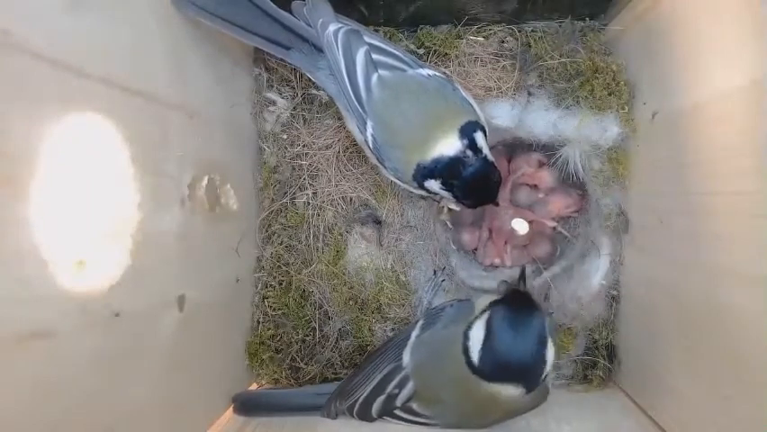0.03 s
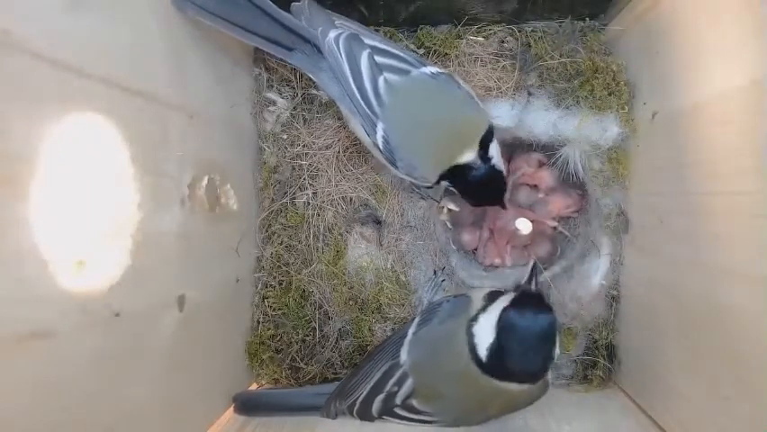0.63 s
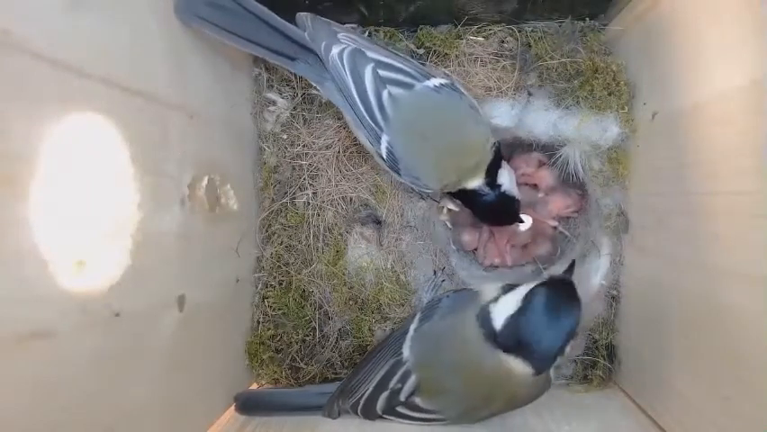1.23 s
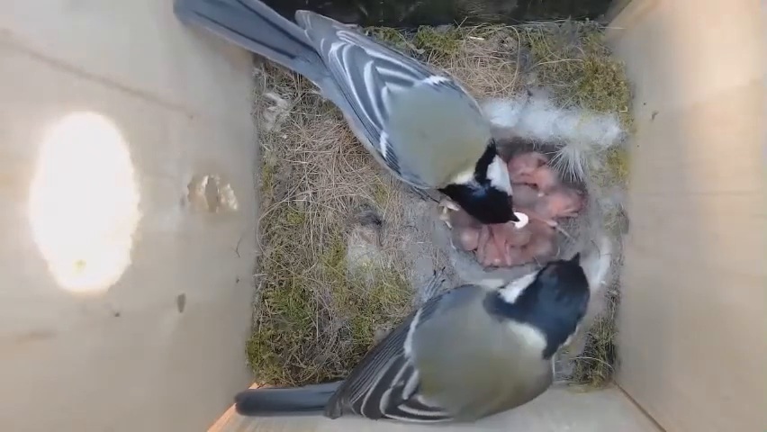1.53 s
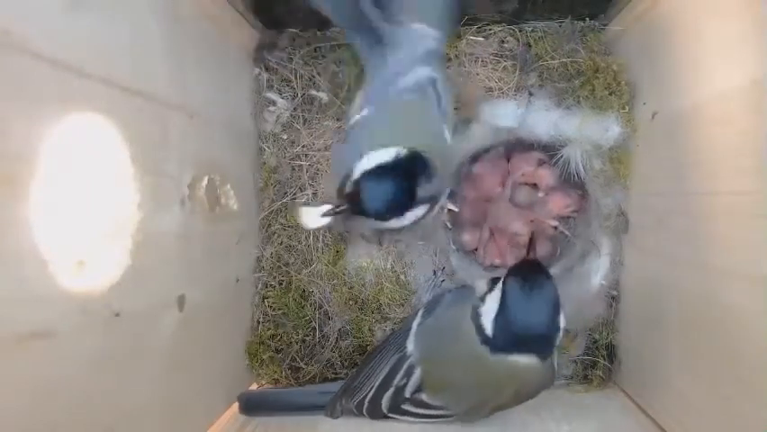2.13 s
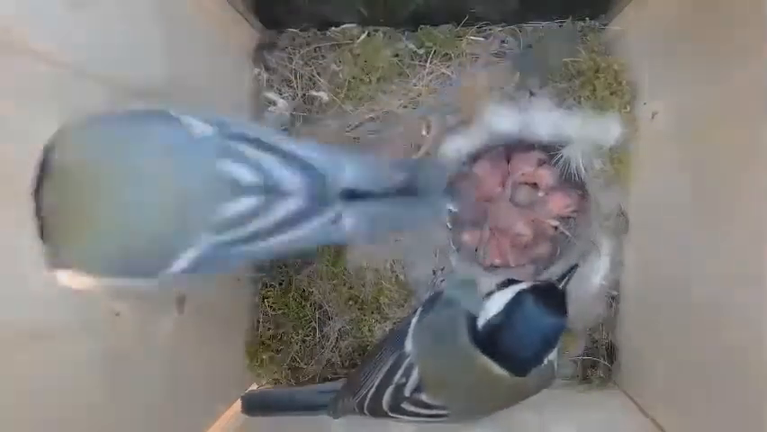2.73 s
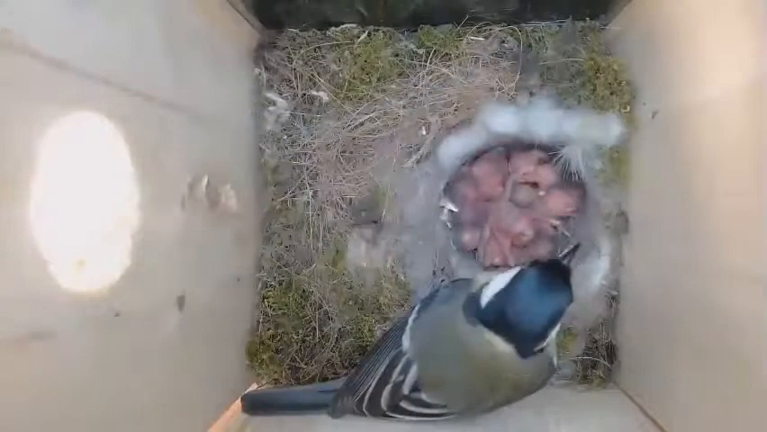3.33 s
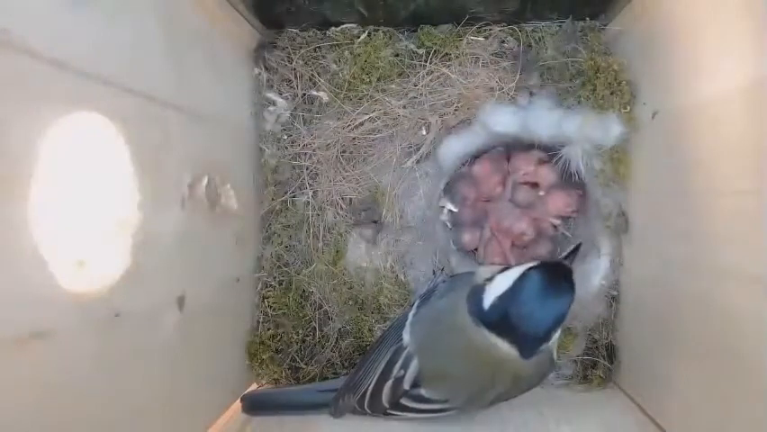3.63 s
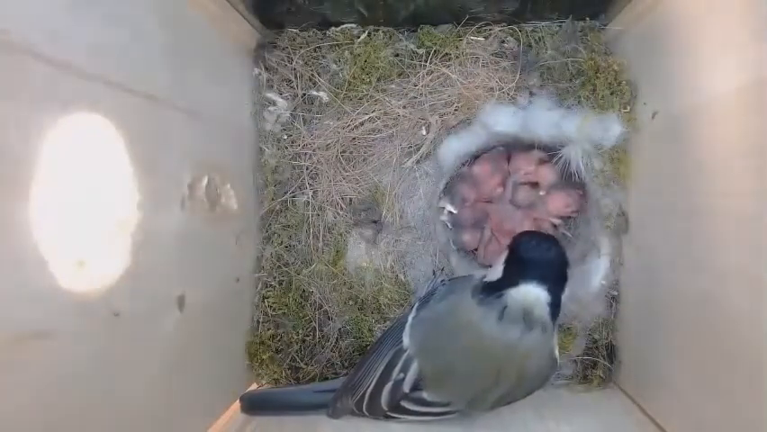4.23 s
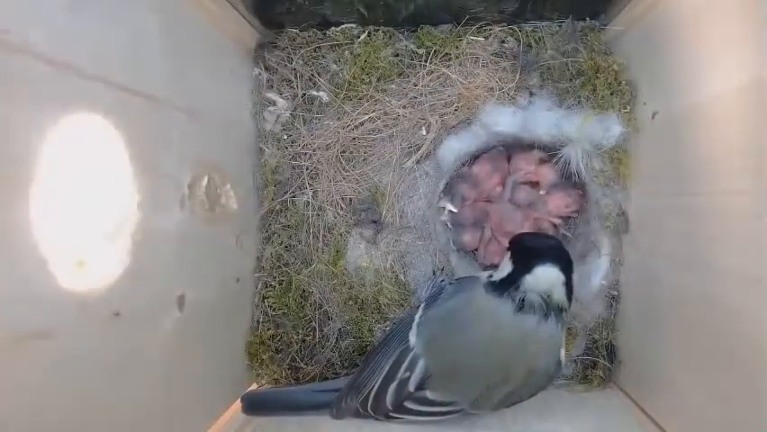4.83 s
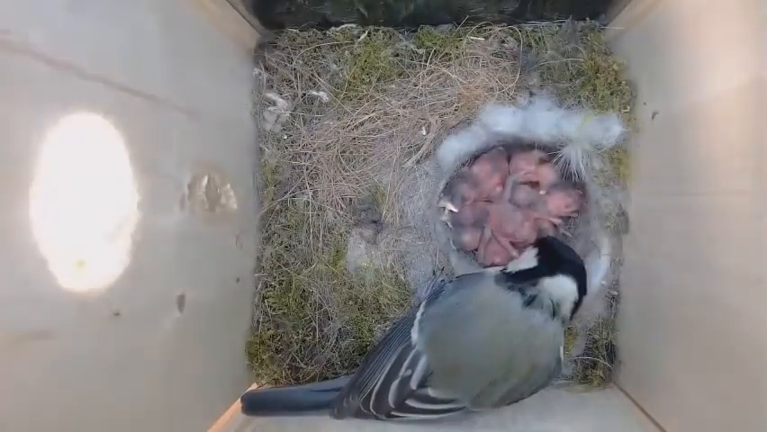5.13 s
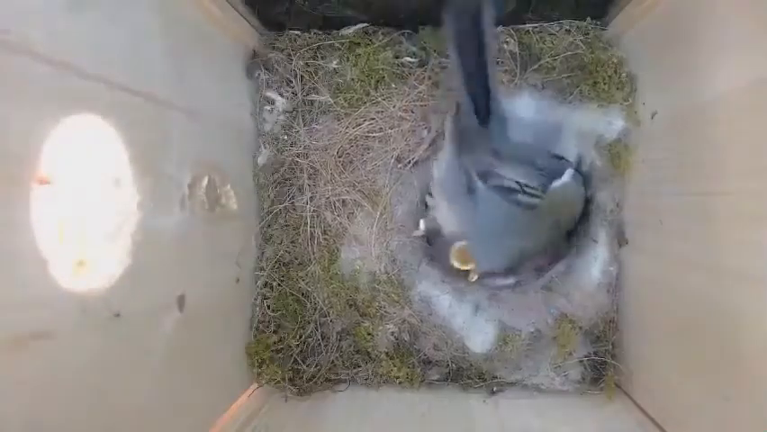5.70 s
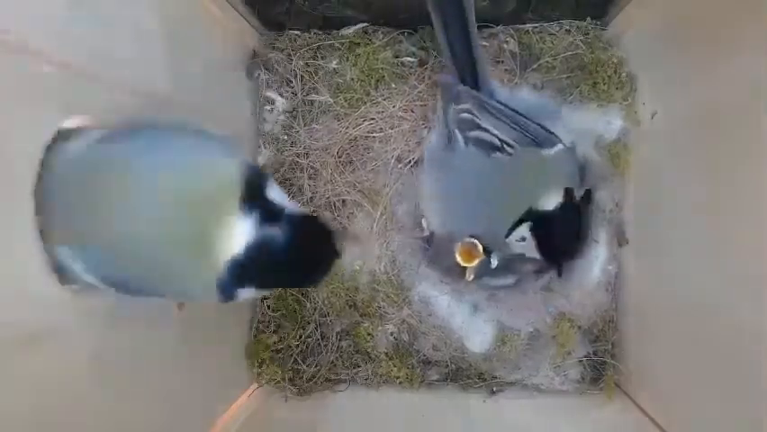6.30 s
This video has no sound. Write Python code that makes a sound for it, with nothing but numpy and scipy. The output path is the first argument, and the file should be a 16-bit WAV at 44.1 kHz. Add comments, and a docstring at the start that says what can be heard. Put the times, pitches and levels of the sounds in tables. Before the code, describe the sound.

Nestlings cheep thinly inside a wooden nest box while an adult bird churrs, scuffs and knocks against the walls.

```python
"""Inside a wooden nest box that colours every sound, over outdoor air and a small camera's faint whine.
Nestlings whistle thin, arched cheeps, shifting feet thump the floor and an adult tit churrs in short
pulse trains. The churrs grow, then claws and wings scuff the walls as one parent climbs out.
A dull knock stutters on the wall and the sound cuts out briefly. It comes back with brighter air
and louder cheeps, and the parent lands again."""
import sys
import numpy as np
from scipy import signal
from scipy.fft import rfft, irfft, next_fast_len
from scipy.io import wavfile
from scipy.ndimage import uniform_filter1d

SR = 44100
rng = np.random.default_rng(int(sys.argv[2]) if len(sys.argv) > 2 else 0)


def wav_out(sig):
    """Save sig, one row per channel (or a flat mono array), as 16-bit PCM at SR to the path in sys.argv[1]."""
    wavfile.write(sys.argv[1], SR, np.round(np.clip(np.atleast_2d(sig).T, -1, 1) * 32767).astype(np.int16))


N = 284886
DROPOUT_START_S, DROPOUT_END_S = 5.375, 5.411

# air and panel resonances of the box: (frequency [Hz], width [Hz], level [dB])
BOX_MODES = [(377.5, 45, -11), (411.9, 36, 3), (480, 42, -11), (560, 39, -11.5), (615.7, 27, -2.5),
             (647.5, 14, -19), (840, 56, -18), (984.3, 40, -8), (1040, 78, -18), (1157, 16, -6),
             (1259.5, 47.5, -1.5), (1315, 30, -18), (1602, 42, -17.5), (1821, 52, -7), (2023, 85, 1.5),
             (2251, 47, -2.5), (2460, 65, -26.5), (3760, 600, -21.5), (5036, 99, -18.5)]
# how well the wood carries sound: (frequency [Hz], gain [dB])
WOOD_EQ = [(200, 10), (310, -13.5), (380, 0), (700, 0), (1300, 1), (2350, -4.5), (2800, -11), (3300, -5.5),
           (3950, -1), (5600, -5), (6800, -2.5), (9000, -11.5)]
# outdoor air before the box colours it: (frequency [Hz], level [dB])
AIR_EQ = [(300, -4), (400, -12), (630, 2), (1000, 4.5), (1300, 0.5), (1600, 5), (1800, 1), (2050, -15),
          (2400, -7.5), (2950, -4), (3800, -12), (4400, -20), (8000, -17)]
# the air slowly dying down: (time [s], level [dB])
AIR_FADE = [(0, -66.5), (.8, -67), (1.5, -70.5), (2.9, -70.5), (3.6, -72), (5.37, -77.5)]
# the restless low bed: (frequency [Hz], level [dB])
RUMBLE_EQ = [(15, -49), (30, -43), (55, -18.5), (90, -5), (124, -5.5), (160, -3.5), (200, -24.5),
             (300, -32.5), (600, -80), (2000, -120)]
# feathers shuffling in the moss: (peak time [s], half length [s], level [dB])
SHUFFLES = [(0.155, 0.19, -62.5), (1.072, 0.0094, -62.5), (1.277, 0.075, -64.5), (1.873, 0.031, -66.5),
            (3.142, 0.16, -68.5), (3.736, 0.038, -65), (4.231, 0.014, -63), (4.523, .06, -56.5),
            (5.898, 0.11, -62.5), (6.44, .05, -49)]
# heavier steps on the nest floor: (peak time [s], level [dB], pitch [Hz])
FOOTFALLS = [(0.616, -40.5, 123), (0.658, -50, 126), (1.353, -48.5, 104), (1.573, -47.5, 154),
             (1.902, -45.5, 145), (2.486, -47.5, 128), (2.75, -45.5, 134.4), (3.253, -41, 139),
             (3.294, -36.5, 132), (3.481, -33.5, 124), (3.673, -43, 117), (3.703, -35.5, 137),
             (3.743, -37.5, 149), (4.311, -43.5, 122), (4.342, -45, 116), (4.942, -50.5, 130),
             (5.922, -45, 134), (6.205, -36, 119.5), (6.299, -36, 147), (6.389, -46.5, 142)]
# stuttering blows on the wall: (time [s], level [dB])
WALL_BLOWS = [(5.09, -29), (5.104, -24), (5.121, -34.5), (5.135, -44.5)]
# that wall's ring: (frequency [Hz], level [dB], t60 [s])
WALL_MODES = [(445, -20.5, 0.21), (617, -6.5, 0.16), (687, -13.5, 0.18), (885, -3.5, 0.17),
              (1210, -6, 0.11), (1314, 4.5, 0.12), (1353, -12.5, 0.17), (1484, -21.5, .08),
              (1848, -18.5, 0.1)]
# dry claw snaps: (time [s], level [dB])
CLAW_TICKS = [(2.562, -40), (2.614, -46), (2.709, -47), (2.866, -49.5), (3.048, -55.5), (6.289, -34.5)]
# claw and wing strokes: (peak time [s], level [dB], swell [s], t60 [s], hardness [dB], scratch [dB])
STROKES = [(.125, -65, .015, 0.077, 7.5, -42), (0.22, -67.5, 0.01, 0.07, 6, -35),
           (1.078, -61.5, 0.0034, .06, 5.5, -2.5), (1.402, -51.5, 0.013, 0.18, -24, -45),
           (1.503, -53, 0.0089, 0.089, -26, -45), (2.584, -56.5, 0.0067, 0.042, -13, -12),
           (2.928, -48, 0.0044, 0.049, -8.5, -10.5), (2.966, -42.5, 0.023, 0.1, -1.5, -16),
           (3.055, -52, 0.033, 0.31, -20, -15.5), (3.231, -44, 0.005, 0.23, -2.5, -21.5),
           (3.249, -43.5, 0.0021, 0.071, 3.5, -5.5), (3.265, -35.5, 0.009, 0.093, 5, -18),
           (3.305, -36.5, 0.022, 0.092, -14.5, -29), (3.451, -46.5, 0.0076, 0.065, 3, -26),
           (3.467, -38.5, 0.0069, 0.12, 2, -19.5), (3.533, -43.5, 0.019, 0.16, -1.5, -13.5),
           (3.561, -40.5, 0.0084, 0.071, 1.5, -11.5), (4.404, -49, .005, .14, -16.5, -45),
           (4.503, -41.5, 0.0012, 0.14, -8.5, -45), (5.912, -62, 0.017, 0.26, -14, -17.5),
           (6.291, -29.5, 0.0018, 0.078, 5, -11.5), (6.311, -35.5, 0.0048, 0.18, -5, -27.5),
           (6.384, -36, 0.0015, 0.1, -2, -24)]
# a stroke's hollow, knock, edge and scratch bands: (low [Hz], high [Hz])
STROKE_BANDS = [(300, 780), (780, 1550), (1550, 2700), (2700, 7500)]
# nestling calls: (time [s], length [s], top of the arch [Hz], level [dB])
NESTLING_CHEEPS = [(0.053, 0.036, 7600, -69.5), (.332, 0.041, 7300, -67), (0.773, 0.046, 7160, -66),
                   (1.072, 0.044, 7330, -64), (1.526, 0.035, 6790, -66), (2.227, 0.043, 7340, -66.5),
                   (3.898, 0.04, 7520, -66), (4.371, 0.039, 7170, -66.5), (4.905, 0.022, 6250, -79),
                   (5.474, 0.072, 8160, -60.5), (5.616, 0.072, 8120, -64.5), (5.696, 0.025, 6140, -61),
                   (5.793, .075, 8300, -57.5), (5.9, .052, 7520, -72), (5.945, 0.074, 8000, -64),
                   (5.952, 0.029, 6560, -57), (6.012, 0.059, 7350, -54.5), (6.231, 0.024, 6140, -70),
                   (6.353, 0.069, 8250, -57.5), (6.4, 0.037, 6630, -59.5)]
# the adult's pulse trains: (first pulse [s], last pulse [s], first pitch [Hz], last pitch [Hz],
# level [dB], opening offset [dB], closing offset [dB], second harmonic offset [dB])
ADULT_CHURRS = [(0.812, .891, 2276, 2330, -46.5, -12.5, -12, -2.5),
                (0.971, 1.056, 2375, 2174, -61.5, -0.5, -19, 5),
                (2.444, 2.47, 2320, 2280, -59, 9.5, 6.5, -1),
                (2.536, 2.616, 2394, 2418, -43.5, -5, 5, -13.5),
                (2.686, 2.82, 2455, 2323, -39.5, -13.5, -17, -11.5),
                (2.871, 2.981, 2367, 2438, -44, 4.5, -1, -24.5),
                (3.051, 3.189, 2474, 2460, -44.5, 1, -23.5, -24)]

# tone curves, each named for what it shapes: (frequency [Hz], gain [dB])
LATE_AIR_EQ = [(400, -1.5), (630, -6), (1100, -0.5), (1800, 2), (2600, 6), (3100, 9), (3800, -3),
               (5000, 2.5)]
DEEP_RUMBLE_EQ = [(12, -16), (25, -12), (50, 2.5), (80, 2), (160, -12), (300, -41), (2000, -100)]
RUSTLE_EQ = [(250, -42.5), (340, 1.5), (430, -4.5), (560, 4), (700, 10.5), (1000, -0.5), (1300, -8),
             (2400, -13), (2800, -17.5), (5000, -22.5), (9000, -32)]
RATTLE_EQ = [(300, -42), (600, -4), (900, -4.5), (1080, -7), (1300, -3.5), (1600, -14.5), (2300, -32),
             (3200, -48), (6000, -66)]
TICK_EQ = [(1500, -34), (4000, -4.5), (7500, 5), (9500, 17.5), (12000, 14), (15000, 8.5)]
RASP_EQ = [(1800, -42.5), (2350, 0.5), (2850, -8), (3500, -1.5), (4300, -2), (5200, 3), (6000, -24.5),
           (7400, 3.5), (9000, -9)]
SIDE_EQ = [(100, -20.5), (600, -21), (1200, -21), (2200, -23.5), (6000, -20.5)]
CAMERA_EQ = [(7300, 0), (7700, -4), (8100, -23.5), (8800, -33), (12000, -46)]
FIZZ_EQ = [(8000, -105), (13000, -101), (15400, -84.5)]


def amp(db):
    """Decibels to gain."""
    return 10 ** (np.asarray(db) / 20)


def unit(x):
    """Scale to rms 1."""
    return x / np.sqrt(np.mean(x ** 2) + 1e-20)


def wobble(shape, samples):
    """Random drift at rms 1, smoothed over this many samples."""
    return unit(uniform_filter1d(rng.standard_normal(shape), size=samples))


def curve(points, hz):
    """Gain of a tone curve, read on a log frequency axis."""
    corners, db = np.transpose(points)
    return amp(np.interp(np.log(hz + 1), np.log(corners), db))


def filtered(x, response):
    """Filter x by a complex response of frequency."""
    n = x.shape[-1]
    padded = next_fast_len(n + 8192)
    return irfft(rfft(x, padded) * response(np.fft.rfftfreq(padded, 1 / SR)), padded)[..., :n]


def eq(x, points):
    """Shape x with a tone curve."""
    return filtered(x, lambda hz: curve(points, hz))


def add(track, start, sound):
    """Mix a sound into a track at start seconds."""
    i = max(round(start * SR), 0)
    track[i:i + len(sound)] += sound[:max(N - i, 0)]


def box(hz, direct_db=-23):
    """The colour of the box: its resonances over a weak direct path."""
    modes = sum(amp(db) * 1j * hz * width / (centre ** 2 - hz ** 2 + 1j * hz * width)
                for centre, width, db in BOX_MODES)
    return curve(WOOD_EQ, hz) * (amp(direct_db) + modes)


def walls(x, wet_db, t60, predelay_s=0.0012):
    """Add the dense, quickly dying reflections between the close walls."""
    t = np.arange(SR // 5) / SR
    tail = rng.standard_normal(len(t)) * amp(-60 * t / t60) * (t > predelay_s)
    return np.pad(x, (0, len(t) - 1)) + amp(wet_db) * signal.fftconvolve(x, tail / np.linalg.norm(tail))


def outdoor_air(late_air_db=-67, rumble_db=-68, late_rumble_db=-71, restless_db=3):
    """Outdoor air resonates in the box over a restless rumble, and is brighter after the dropout."""
    t = np.arange(N) / SR
    air = unit(filtered(rng.standard_normal(N),
                        lambda hz: box(hz) * curve(AIR_EQ, hz) * amp(-60 * (hz < 200))))
    swells = amp(restless_db * wobble(N, 4000))
    rumble = unit(swells * eq(rng.standard_normal(N), RUMBLE_EQ))
    early = amp(np.interp(t, *np.transpose(AIR_FADE))) * air + amp(rumble_db) * rumble
    late = amp(late_air_db) * eq(air, LATE_AIR_EQ) + amp(late_rumble_db) * rumble
    return np.where(t < DROPOUT_START_S, early, late)


def deep_rumble(level_db=-68):
    """A deeper rumble sets in once the sound comes back."""
    noise = unit(eq(rng.standard_normal(N), DEEP_RUMBLE_EQ))
    return amp(level_db) * noise * (np.arange(N) / SR > DROPOUT_END_S)


def camera_whine(frame_hz=30, pitch_hz=3360, early_db=-81, late_db=-69, shake_hz=35):
    """The electronics give a tiny, rough, hooked chirp once a frame, louder after the dropout."""
    t = np.arange(N) / SR
    early = t < DROPOUT_START_S
    cycle = (t * frame_hz + np.where(early, .11, -.1)) % 1 - .5
    pitch_shake, level_shake = wobble((2, N), 100)
    hook_hz = 500 * cycle ** 2 + 16000 * np.maximum(cycle - .12, 0) ** 2
    hz = pitch_hz + hook_hz + shake_hz * pitch_shake
    level = amp(np.where(early, early_db, late_db) + 2 * level_shake)
    return level * np.exp(-(cycle / .22) ** 2) * np.sin(2 * np.pi * np.cumsum(hz) / SR)


def feather_rustle(lumpy_db=5.5):
    """Swells of soft, uneven rubbing mostly wake the low resonances of the box."""
    t = np.arange(N) / SR
    pressure = sum(amp(db) * np.exp(-((t - peak) / half) ** 2) for peak, half, db in SHUFFLES)
    rubbing = amp(lumpy_db * wobble(N, 700)) * rng.standard_normal(N)
    return pressure * unit(filtered(rubbing, lambda hz: box(hz) * curve(RUSTLE_EQ, hz)))


def foot_thumps(rise_s=0.0057, fall_s=0.01085, shift_gap_s=0.17, shift_db=-56.5, shift_hz=130.7):
    """Each step sways the nest floor for a few low cycles; light shifts of weight fall in between."""
    out = np.zeros(N)
    lead = .05
    t = np.arange(SR // 5) / SR - lead
    swell = np.where(t < 0, np.exp(-(t / rise_s) ** 2), 1 / np.cosh(t / fall_s))
    shifts = [((k + .5 * late) * shift_gap_s, shift_db + 2 * weight, shift_hz + 23 * stiffness)
              for k, (late, weight, stiffness) in enumerate(rng.standard_normal((60, 3)), 1)]
    for peak, db, hz in FOOTFALLS + shifts:
        add(out, peak - lead, amp(db) * swell * np.sin(2 * np.pi * (hz * t + rng.random())))
    return out


def wall_knocks(attack_s=0.0032, swing_t60=0.022, ring_db=-12, rattle_db=-12, rattle_t60=0.17):
    """Soft blows ring one wall; the first swing dies fast and a weaker, rough ring stays."""
    out = np.zeros(N)
    t = np.arange(SR // 4) / SR
    onset = 1 - np.exp(-(t / attack_s) ** 2)
    for start, db in WALL_BLOWS:
        ring = sum(amp(level + 2 * rng.standard_normal() - 60 * t / t60)
                   * np.sin(2 * np.pi * (hz * t + rng.random())) for hz, level, t60 in WALL_MODES)
        ring *= amp(ring_db) + amp(-60 * t / swing_t60)
        rattle = unit(eq(rng.standard_normal(len(t)), RATTLE_EQ)) * amp(rattle_db - 60 * t / rattle_t60)
        add(out, start, amp(db) * onset * (ring + rattle))
    return out


def claw_ticks(t60=0.017):
    """A claw tip snaps on the wood: a very short, bright crack."""
    out = np.zeros(N)
    t = np.arange(SR // 30) / SR
    for start, db in CLAW_TICKS:
        add(out, start, amp(db - 60 * t / t60) * rng.standard_normal(len(t)))
    return eq(out, TICK_EQ)


def scuffs(grit=0.21, full_contact_db=-42.5, lead_in_db=-20, tail_db=-27, tail_t60=0.057):
    """Claws and wings ring the box with swelling scrapes; harder ones reach the higher bands."""
    out = np.zeros(N)
    lead = .08
    t = np.arange(SR // 3) / SR - lead
    hz = np.fft.rfftfreq(2 * len(t), 1 / SR)
    filters = [signal.butter(3, band, "bandpass", fs=SR, output="sos") for band in STROKE_BANDS]
    colour = np.array([signal.sosfreqz(sos, hz, fs=SR)[1] for sos in filters]) * box(hz)
    for peak, db, swell, t60, hardness, scratch in STROKES:
        rising = np.exp(-(t / swell) ** 2) + amp(lead_in_db) * np.exp(-(t / (2 * swell)) ** 2)
        falling = amp(-60 * t / t60) + amp(tail_db - 60 * t / tail_t60)
        stroke = np.where(t < 0, rising, falling)
        force = stroke * rng.standard_normal(len(t)) * np.exp(grit * wobble(len(t), 30))
        rings = irfft(rfft(force, 2 * len(t)) * colour)[:, :len(t)]
        softening = .9 * min(db - full_contact_db, 0)  # light strokes lose their edge
        gains = amp(db + np.array([0, hardness, hardness + softening - 2.5, scratch - 1]))
        makeup = np.linalg.norm(stroke) / np.linalg.norm(rings, axis=1)
        add(out, peak - lead, (gains * makeup) @ rings)
    return out


def cheeps(start_hz=5900, end_hz=5300, pull=0.8, fade_s=0.009, waver=.011, flutter_db=4.5, trim_db=-3):
    """Each nestling cheep is a thin, slightly hoarse whistle that climbs and drops along an arch."""
    out = np.zeros(N)
    for start, length, top, db in NESTLING_CHEEPS:
        t = np.arange(int(length * SR)) / SR
        noise = rng.standard_normal((2, len(t)))
        pitch_shake, level_shake = unit(signal.fftconvolve(noise, np.hanning(70)[None], "same"))
        # both ends are pulled towards the chick's resting pitch
        climb, drop = pull * np.abs([top - start_hz, top - end_hz])
        hz = top - np.linspace(-np.sqrt(climb), np.sqrt(drop), len(t)) ** 2
        swell = np.sin(np.pi / 2 * np.clip(np.minimum(t, length - t) / fade_s, 0, 1)) ** 2
        whistle = np.sin(2 * np.pi * np.cumsum(hz * (1 + waver * pitch_shake)) / SR)
        level = amp(db + trim_db + flutter_db * level_shake)
        add(out, start, walls(level * swell * whistle, wet_db=-5, t60=0.066))
    return out


def squeak(start_s=3.031, length_s=0.015, start_hz=2950, end_hz=3450, level_db=-53):
    """One short rising note opens the last churr."""
    out = np.zeros(N)
    hz = np.linspace(start_hz, end_hz, int(length_s * SR))
    note = np.hanning(len(hz)) * np.sin(2 * np.pi * np.cumsum(hz) / SR)
    add(out, start_s, walls(amp(level_db) * note, wet_db=-7, t60=.07))
    return out


def churr_pulses(period_s=.027, second_growth_db=9):
    """A churr starts thin and fills out downwards: yields (time [s], pitch [Hz], three harmonics [dB])."""
    for start, end, start_hz, end_hz, db, opening_db, closing_db, second_db in ADULT_CHURRS:
        for progress in np.linspace(0, 1, round((end - start) / period_s) + 1):
            effort = db + opening_db * (1 - progress) ** 5
            closing = closing_db * progress ** 5
            low = effort + 0.52 * closing  # the lower harmonics follow the closing only partly
            first = low - 10.5 - 26 * (1 - progress) ** 4
            second = low + second_db + second_growth_db * (progress - .5)
            pitch = start_hz + progress * (end_hz - start_hz)
            yield start + progress * (end - start), pitch, first, second, effort + closing


def pulse_swell(t, rise_s=0.0019, fall_s=0.0025, trail_s=.004, trail_db=-11):
    """One churr pulse peaks within milliseconds, with a softer bump trailing it."""
    peak = np.exp(-(t / np.where(t < 0, rise_s, fall_s)) ** 2)
    trail = np.exp(-((t - trail_s) / np.where(t < trail_s, trail_s, 0.0029)) ** 2)
    return peak + amp(trail_db) * trail


def churrs(droop=0.14, roughness=0.023, low_lag_s=0.0025, rasp_db=-13, trim_db=3):
    """The adult's pulses are harmonic tones that slide down and turn hoarse as they fade."""
    out = np.zeros(N)
    lead = .012
    t = np.arange(int(4 * lead * SR)) / SR - lead
    glide = 1.025 - droop / (1 + np.exp(-(t - .0038) / 0.0021))
    for peak, pitch, first, second, third in churr_pulses():
        jitter = roughness * (1 + (t > .003)) * wobble(len(t), 30)
        phase = 2 * np.pi * np.cumsum(pitch * (glide + jitter)) / SR
        tone = amp(first) * pulse_swell(t - low_lag_s) * np.sin(phase)
        tone += pulse_swell(t) * (amp(second) * np.sin(2 * phase) + amp(third) * np.sin(3 * phase))
        rasp = unit(eq(rng.standard_normal(len(t)), RASP_EQ)) * np.exp(-((t - .004) / 0.012) ** 2)
        rasp *= amp(rasp_db) * (0.89 * amp(second) + 0.18 * amp(third))  # rides on the upper harmonics
        add(out, peak - lead, walls(amp(trim_db) * (tone + rasp), wet_db=-8, t60=0.08))
    return out


def scene():
    """All sources reach one microphone; a faint smear gives a hint of stereo width."""
    calls = cheeps() + churrs() + squeak()
    movements = scuffs() + claw_ticks() + wall_knocks() + foot_thumps() + feather_rustle()
    mid = calls + movements + camera_whine() + outdoor_air() + deep_rumble()
    smear = walls(mid, wet_db=1, t60=.02)[:N] - mid
    side = eq(smear, SIDE_EQ)
    return np.array([mid + side, mid - side])


def record(dry, top_hz=15500):
    """The camera rolls off the top octave and adds faint hiss, brighter after the gap; the sound drops out
    briefly."""
    t = np.arange(N) / SR
    late = t > DROPOUT_END_S
    gate = uniform_filter1d(1.0 * ((t < DROPOUT_START_S) | late), size=100)
    sound = gate * eq(dry, CAMERA_EQ)
    hiss = amp(-93.5) * rng.standard_normal(N) + amp(-106) * rng.standard_normal((2, N))
    fizz = late * eq(rng.standard_normal(N), FIZZ_EQ)
    return filtered(sound + hiss + fizz, lambda hz: hz < top_hz)


dry = scene()
out = record(dry)
wav_out(out)
```